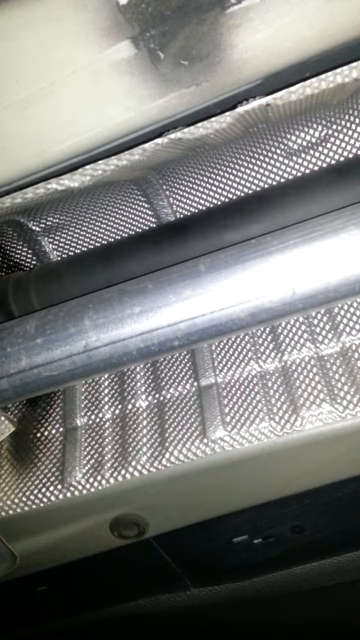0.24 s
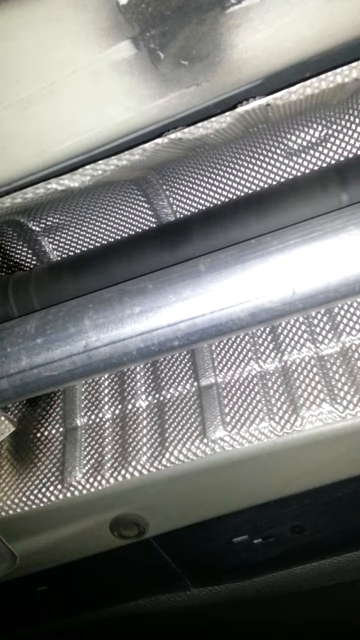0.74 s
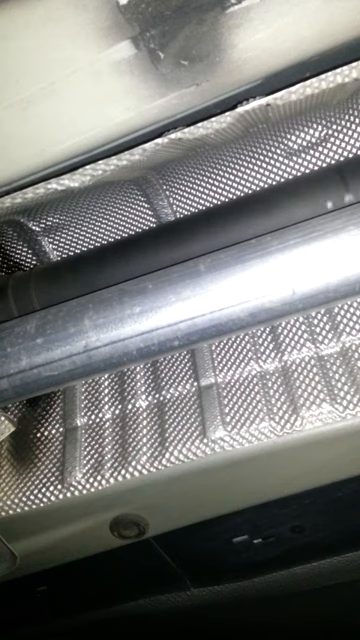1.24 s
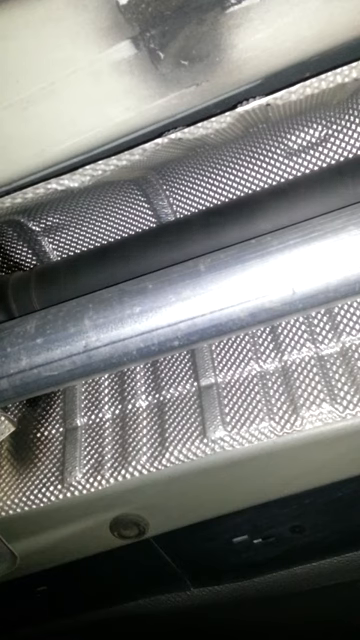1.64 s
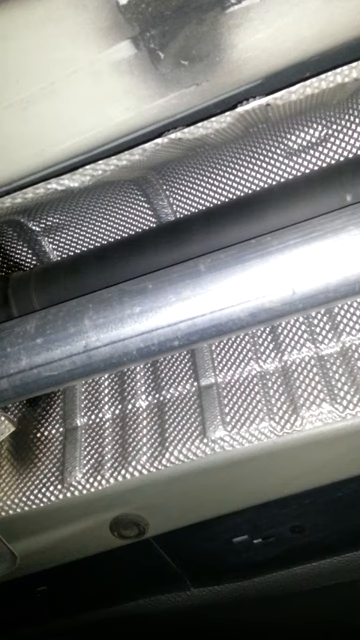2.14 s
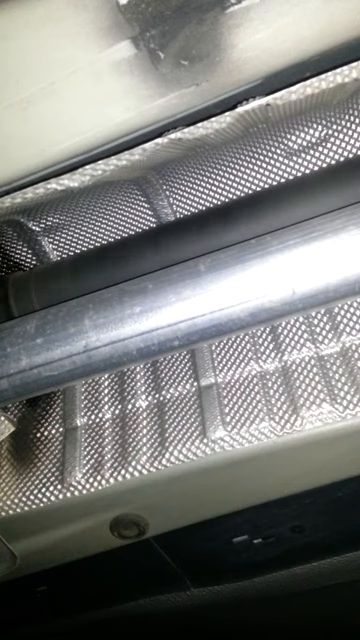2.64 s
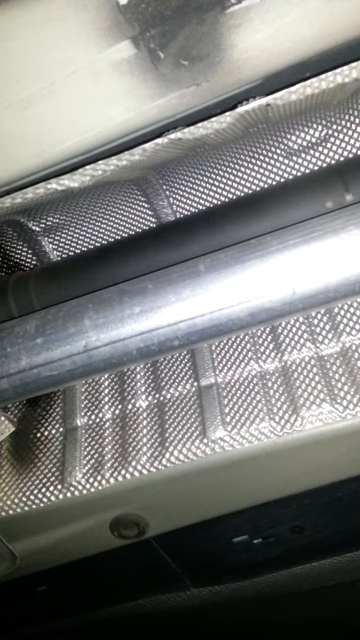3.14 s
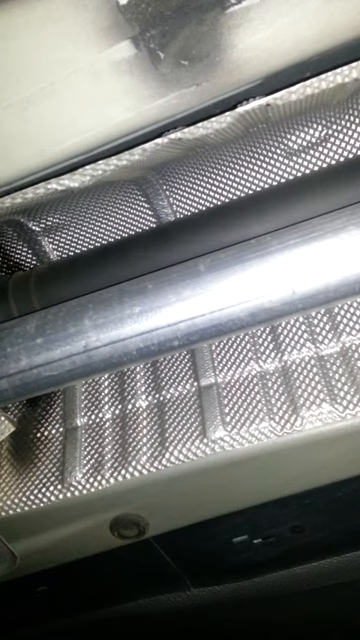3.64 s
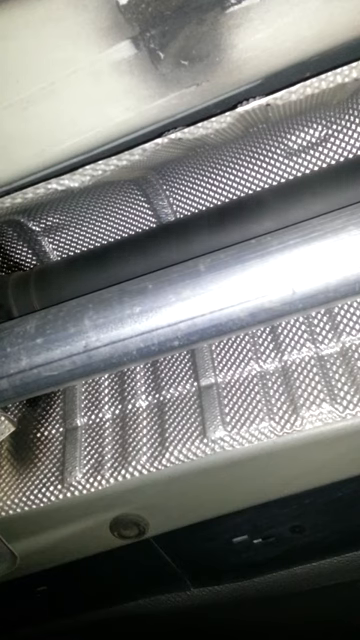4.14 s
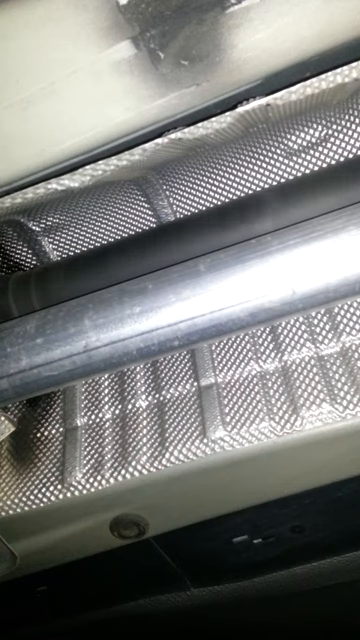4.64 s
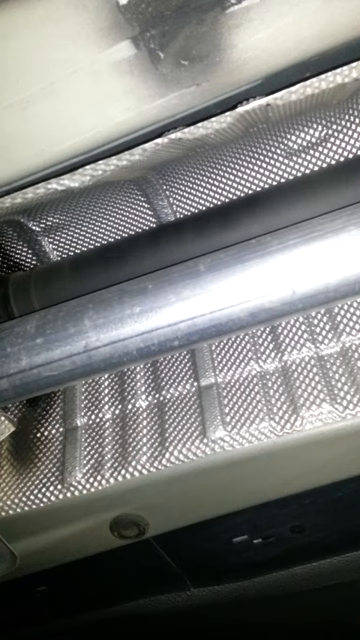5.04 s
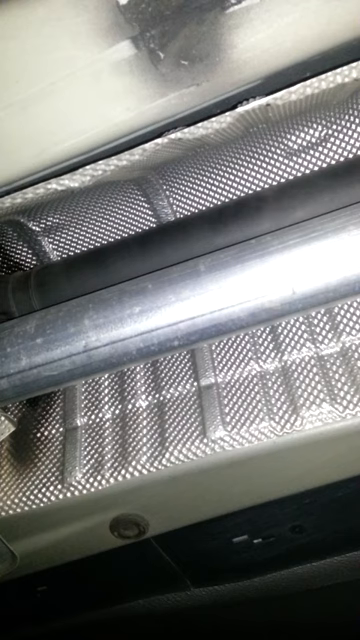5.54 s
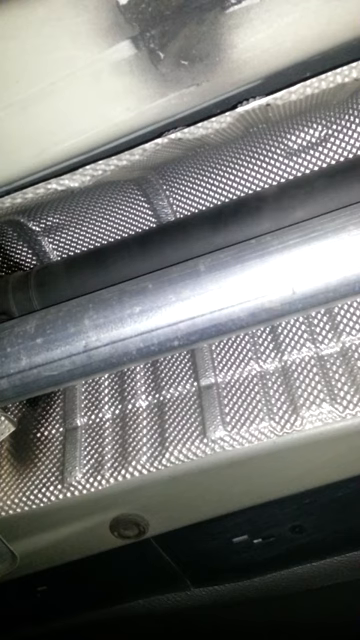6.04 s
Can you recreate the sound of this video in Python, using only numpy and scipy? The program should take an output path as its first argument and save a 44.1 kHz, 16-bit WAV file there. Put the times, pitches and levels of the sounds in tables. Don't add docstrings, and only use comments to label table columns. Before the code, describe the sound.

Sharp metallic clacks with rattling bounces ring a steel shaft under an idling car as the engine hums, revs up once and falls back.

```python
import sys
import numpy as np
from scipy import signal
from scipy.fft import rfft, irfft
from scipy.io import wavfile
from scipy.ndimage import uniform_filter1d, map_coordinates

SR = 44100
rng = np.random.default_rng(int(sys.argv[2]) if len(sys.argv) > 2 else 0)


def dump(signal):
    limited = np.clip(np.atleast_2d(signal).T, -1, 1)
    pcm = np.round(limited * 32767).astype(np.int16)
    wavfile.write(sys.argv[1], SR, pcm)


def linear_from_db(decibels):
    return 10 ** (np.asarray(decibels, float) / 20)


N = 277830


def unit(x):
    return x / np.sqrt(np.mean(x ** 2) + 1e-20)


def along(points, hz):
    point_hz, value = np.transpose(points)
    return np.interp(np.log(hz + 1), np.log(point_hz + 1), value)


def curves(rows):
    seconds, *columns = np.transpose(rows)
    return [np.interp(np.arange(N) / SR, seconds, column) for column in columns]


def wobble(rate):
    coarse = np.arange(0, N + 64, 64)
    knots = rng.standard_normal(int(N * rate / SR) + 4)
    return np.interp(np.arange(N), coarse, map_coordinates(knots, [coarse * rate / SR]))


def noise(spectrum, count=N):
    white = rfft(rng.standard_normal(count))
    colour = linear_from_db(along(spectrum, np.fft.rfftfreq(count, 1 / SR)))
    return unit(irfft(white * colour, count))


def add(track, s, sound):
    place = track[round(s * SR):][:len(sound)]
    place += sound[:len(place)]


# frequency in Hz, level in dB per Hz.
FIZZ_COLOUR = [(5000, -32), (8000, 5), (10000, 4), (13000, -13), (15700, -29), (16000, -60)]


def fizz():
    return linear_from_db(-65.5 + 0.92 * wobble(8.9)) * noise(FIZZ_COLOUR)


# time in seconds, frequency in Hz.
WHINE_PITCH = [(0, 10830), (1.9, 10850), (2.7, 10840), (3.6, 10560), (3.8, 10480), (4.1, 10620),
               (5.2, 10800), (5.9, 10780), (6.3, 10850)]


def whine(rate_hz):
    fades_above_hz, db_per_hz = 40, -2.5
    level_db = -71 + db_per_hz * np.clip(rate_hz - fades_above_hz, 0, None)
    pitch_hz = curves(WHINE_PITCH)[0] + 12 * wobble(20)
    return linear_from_db(level_db + 3.8 * wobble(12)) * np.sin(2 * np.pi * np.cumsum(pitch_hz) / SR)


IDLE_HZ = 30
# frequency in Hz, level in dB per Hz.
HISS_COLOUR = [(350, -23), (600, -1), (750, -3), (1000, 3), (1400, 1.5), (1900, 0.5), (2500, -4.5),
               (3200, -3), (4200, -1), (4800, 3.5), (5500, 1), (6300, -6.5), (8000, -18.5), (10000, -26.5)]
# frequency in Hz, level in dB per Hz.
RUMBLE_COLOUR = [(28, -45), (42, -36), (55, -5), (70, -6.5), (110, -6), (150, -8), (230, -4.5), (330, -6.5),
                 (460, -7.5), (600, -17), (900, -31.5), (1500, -67.5)]


def hiss_and_rumble(rate_hz):
    revs = rate_hz - IDLE_HZ
    hiss = linear_from_db(-40 + 0.3646 * revs + 0.38 * wobble(20)) * noise(HISS_COLOUR)
    rumble = linear_from_db(-43.5 + 0.4551 * revs + 0.93 * wobble(2.5)) * noise(RUMBLE_COLOUR)
    return hiss + rumble


# frequency in Hz, level in dB per Hz.
TICK_COLOUR = [(1500, -32), (4000, 2.5), (6000, 3), (8000, -9.5), (11000, -15), (13000, -39), (16000, -48)]


def valves(rate_hz, turns):
    def rasp(phase):
        return np.sqrt(phase) * np.exp(-phase / 0.2)

    pulses = rasp(turns % 1) + 0.16 * rasp((turns + 0.5) % 1)
    ticking = unit(noise(TICK_COLOUR) * pulses * linear_from_db(0.27 * wobble(29)))
    return linear_from_db(-46 - 2.9 * (rate_hz - IDLE_HZ)) * ticking


TONE_MULTIPLES = [1, 2, 3, 4, 4.8, 5, 6, 7, 7.2, 8]
TONE_LEVELS = [-50, -31.5, -33, -39, -47, -54, -54, -53, -52, -46]
# frequency in Hz, gain in dB.
PIPE_GAIN = [(36, -13), (47, 9), (58, -11.5), (68, -10.5), (80, -1), (92, -2.5), (103, -12.5), (120, -18),
             (140, -14.5), (168, 1.5), (188, -15.5), (222, 4.5), (242, -2.5), (265, -18)]


def exhaust(rate_hz, turns):
    tones = np.zeros(N)
    for multiple, db in zip(TONE_MULTIPLES, TONE_LEVELS):
        level_db = db + along(PIPE_GAIN, multiple * rate_hz) + 2 * wobble(6.1)
        tones += linear_from_db(level_db) * np.sin(2 * np.pi * (multiple * turns + rng.random()))
    return np.sqrt(2) * tones


# time in seconds, firing rate in Hz.
ENGINE_SPEED = [(0, 28.8), (0.8, 30.2), (1.5, 31.6), (1.75, 33.2), (2.0, 37.4), (2.3, 41.1), (2.75, 45.7),
                (3.15, 47), (3.35, 45), (3.5, 41.7), (3.7, 36.6), (4.0, 33.6), (4.25, 31.4), (4.9, 30.4),
                (5.45, 29.4), (5.8, 30.1), (6.3, 30.4)]


def engine():
    rate_hz, = curves(ENGINE_SPEED)
    turns = np.cumsum(rate_hz) / SR
    return exhaust(rate_hz, turns) + valves(rate_hz, turns) + hiss_and_rumble(rate_hz) + whine(rate_hz)


# start in seconds, peak level in dB, length in seconds.
AIR_SPITS = [
    (1.926, -19, 0.02),
    (2.686, -17.5, 0.015),
    (2.878, -30, 0.03),
    (3.3284, -38, 0.021),
    (5.262, -16, 0.017),
    (5.311, -19, 0.029),
    (6.212, -24, 0.028),
]
# frequency in Hz, level in dB per Hz.
SPIT_COLOUR = [(1470, -47), (2500, -13.5), (5450, 0), (6340, -6), (7210, -17), (8510, -17.5), (10100, -19),
               (14000, -35)]


def spits():
    track, t = np.zeros(N), np.arange(SR // 8) / SR
    for s, db, length in AIR_SPITS:
        puff = (1 - np.exp(-t / 0.0024)) * np.exp(-(t / length) ** 2)
        add(track, s, linear_from_db(db - 11) * noise(SPIT_COLOUR, count=len(t)) * puff)
    return track


# start in seconds, peak level in dB, low tube ring in
# dB, high tube ring in dB, body shake in dB.
JOINT_BLOWS = [
    (0.0164, -3, -28, -14, -28),
    (0.5955, -5.5, -34, -7.5, -41),
    (1.1527, -3.5, -21, -17.5, -41),
    (1.6731, 0, -17.5, -13, -34),
    (2.1266, 5.5, -19.5, -9.5, -37),
    (2.4942, -3.5, -23, -10, -23),
    (3.1103, 8, -22, -6.5, -32.5),
    (3.4266, 1, -31, -12.5, -35),
    (4.2393, -2, -24.5, -32, -29),
    (4.7676, -2, -38, -24, -41),
]


def shudder():
    rock_hz, beat_hz, t60 = 49.6, 4.6, 0.82
    track, t = np.zeros(N), np.arange(SR) / SR
    rock = linear_from_db(-60 * t / t60) * np.sin(np.pi * beat_hz * t) * np.sin(2 * np.pi * rock_hz * t)
    for s, *_, shake_db in JOINT_BLOWS:
        add(track, s, linear_from_db(shake_db + 2) * rock)
    return track


# time in seconds, angle in half turns.
SHAFT_ANGLE = [(-.09, -.5), (.934, 3.5), (1.508, 6.5), (1.789, 7.5), (1.977, 8.5), (2.224, 9.5),
               (2.376, 10.5), (2.789, 13.5), (3.032, 15.5), (3.204, 16.5), (3.306, 17.5), (3.485, 18.5),
               (3.789, 20.5), (4.145, 22.5), (4.399, 23.5), (4.6, 24.5), (4.8, 25), (6.3, 25)]


def shaft_tone():
    bend_hz, t60 = 1206, 3.9
    even = 0.17
    t = np.arange(N) / SR
    stored = np.zeros(N)
    for s, db, *_ in JOINT_BLOWS:
        stored += (t > s) * linear_from_db(2 * (-40 + 0.64 * db - 60 * (t - s) / t60))
    facing = np.cos(np.pi * curves(SHAFT_ANGLE)[0]) + 1j * even
    cycles = np.cumsum(bend_hz + 0.7 * wobble(3)) / SR
    return np.sqrt(2 * stored) * (facing * np.exp(2j * np.pi * cycles)).imag


def bell(hz, modes, t):
    hz = np.append(hz, hz + rng.uniform(5, 15, len(hz)))
    twins = [(db - 7, t60) for db, t60 in modes]
    db, t60 = np.transpose(modes + twins)[..., None]
    onset = 1 - np.exp(-t / 0.0016)
    waves = linear_from_db(db - 60 * t / t60) * onset * np.exp(2j * np.pi * np.outer(hz, t))

    def strike():
        level = linear_from_db(2.2 * rng.standard_normal(len(hz)))
        phase = np.exp(2j * rng.standard_normal(len(hz)))
        return ((level * phase) @ waves).imag

    return strike


# frequency in Hz, T60 in seconds.
CLASH_FADE = [(300, 0.4), (1400, 0.076), (4000, 0.034), (8000, 0.19), (15000, 0.07)]


def burst(spectrum, rise, rattle_db):
    start = 256
    hz, t, bands = signal.stft(noise(spectrum, count=SR // 4), SR, nperseg=128)
    fading = linear_from_db(-60 * np.abs(t - start / SR) / along(CLASH_FADE, hz)[:, None])
    jumps = unit(uniform_filter1d(rng.standard_normal(len(t)), size=4))
    chatter = linear_from_db(rattle_db * np.clip(t / 0.0076, 0, 1) * jumps)
    rush = signal.istft(bands * fading * chatter, SR, nperseg=128)[1][start:]
    return rush * (1 - np.exp(-np.arange(len(rush)) / SR / rise))


# frequency in Hz, level in dB per Hz.
CLASH_COLOUR = [(900, -8.5), (1800, 0.5), (2600, -7), (3600, 1), (4400, -3.5), (5000, -0.5), (7000, -10),
                (8200, -21.5), (12000, -21.5), (15500, -58), (16200, -70)]


def shield(t):
    count = 64
    hz = rng.uniform(800, 8000, count)
    db = -25.5 + along(CLASH_COLOUR, hz) + 2 * rng.standard_normal(count)
    t60 = rng.uniform(0.06, 0.15, count)
    return bell(hz, list(zip(db, t60)), t)


# frequency in Hz, level in dB per Hz.
KNOCK_COLOUR = [(150, -23), (280, -27), (440, -3), (650, -7.5), (950, 2.5), (1400, 4), (1800, 4),
                (2300, -2), (3500, -48)]
# start in seconds, peak level in dB,
# knock in dB, low tube ring in dB.
JOINT_BOUNCES = [(0.1394, -28, -0.5, -25), (0.664, -19.5, -6, -23), (0.7448, -20.5, -10, -9),
                 (1.237, -13, -5, -6.5), (1.688, -5, -28, -3), (1.7448, -15.5, -5.5, -26),
                 (2.1889, -3, -13.5, -37), (2.235, -20, -9, -14), (2.5195, -12, 0, -8),
                 (2.5473, -7, -6.5, -3), (2.583, -23.5, -1.5, -11), (2.6144, -21.5, -8, -23),
                 (2.814, -20, 1, -2), (2.891, -18, -6, -27), (2.9227, -20.5, -1.5, -23),
                 (3.1685, -5, -7, -29), (3.209, -20.5, -13, 6), (3.4597, -13.5, -7, -36),
                 (3.4878, -6.5, -5.5, -26), (3.5278, -17, -5, -1), (4.2995, -19, -20, -22),
                 (4.3589, -21, -4.5, -25), (4.7844, -10, -10, -36), (4.8364, -14, -5.5, -11),
                 (4.8794, -23, -24, -25), (6.219, -25, -12, -34)]
LOW_MODES, MIDDLE_MODES, HIGH_MODES = [2441], [3456, 3515, 3623, 3763], [4079, 4151]
COMMON_MODES, PAN_MODES, DRONE_MODES = [2004, 2200, 2943, 4692, 4983, 5395, 5633, 6130, 6856, 7490], [440, 904, 1130, 1281, 1375, 1437, 1680, 1770], [1437, 1680]
# level in dB, T60 in seconds.
LOW_DECAY, MIDDLE_DECAY, HIGH_DECAY = [(-13, .35)], [(1, .1), (-13, .25), (-13, .6), (-19, .45)], [(-5.5, 0.13), (-9.5, 0.32)]
COMMON_DECAY, PAN_DECAY, DRONE_DECAY = [(-29, .45), (-36, .35), (-26, .24), (-23, .17), (-25, .12),
                                        (-30, .12), (-32, .16), (-34, .12), (-36, .12), (-36, .1)], [(-13, .12), (-10, .1), (-10, .12), (-20, .6),
                                                             (-3, .12), (-12, .15), (-14, .15), (-6, .07)], [(-38, .9), (-34, 1.1)]


def clacks():
    track, t = np.zeros(N), np.arange(SR // 2) / SR
    low = bell(LOW_MODES, LOW_DECAY, t)
    middle = bell(MIDDLE_MODES, MIDDLE_DECAY, t)
    high = bell(HIGH_MODES, HIGH_DECAY, t)
    common = bell(COMMON_MODES, COMMON_DECAY, t)
    pan = bell(PAN_MODES, PAN_DECAY, t)
    drone = bell(DRONE_MODES, DRONE_DECAY, t)
    sheet = shield(t[:SR // 5])
    group = 1.5 * np.exp(-((t - 0.035) / 0.038) ** 2) * (1 - np.exp(-t / 0.004))
    swell = group * np.sin(2 * np.pi * 2444 * t)

    def contact(s, db, knock_db, tube):
        colour = [(hz, level + 0.17 * db * np.log2(hz / 4000)) for hz, level in CLASH_COLOUR]
        add(track, s, linear_from_db(db - 11.5) * burst(colour, rise=0.000095, rattle_db=0.5))
        add(track, s, linear_from_db(db + knock_db - 4.5) * burst(KNOCK_COLOUR, rise=0.0006, rattle_db=3.8))
        add(track, s, linear_from_db(db) * sheet())
        add(track, s, linear_from_db(db) * (tube + linear_from_db(2.5) * common() + linear_from_db(knock_db - 1.5) * pan()))

    for s, db, low_db, high_db, _ in JOINT_BLOWS:
        knock_db = -14 + (0.32 - 1) * db
        middle_db = -12.5 + (0.64 - 1) * db
        tube = linear_from_db(low_db) * (swell + low()) + linear_from_db(middle_db) * middle() + linear_from_db(high_db) * high() + drone()
        contact(s, db, knock_db, tube)
    for s, db, knock_db, low_db in JOINT_BOUNCES:
        blow_before = [blow for blow in JOINT_BLOWS if blow[0] < s][-1]
        high_db = blow_before[3] - 1.5
        tube = linear_from_db(low_db) * low() + linear_from_db(-18) * middle() + linear_from_db(high_db) * high()
        contact(s, db, knock_db, tube)
    return track


def scene():
    mix = fizz() + engine() + spits() + shudder() + shaft_tone() + clacks()
    return mix[None]


def low_pass(x):
    return signal.sosfilt(signal.butter(12, 15850, fs=SR, output="sos"), x)


def record(dry):
    hard = 12
    clipped = dry / (1 + np.abs(dry) ** hard) ** (1 / hard)
    return low_pass(clipped)


dry = scene()
out = record(dry)
dump(out)
```